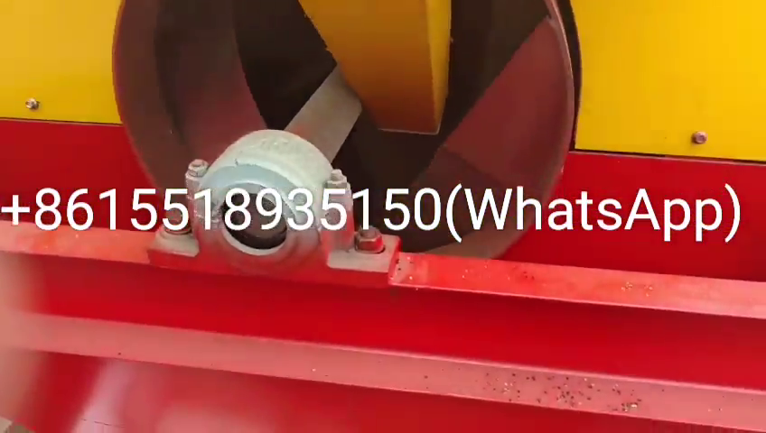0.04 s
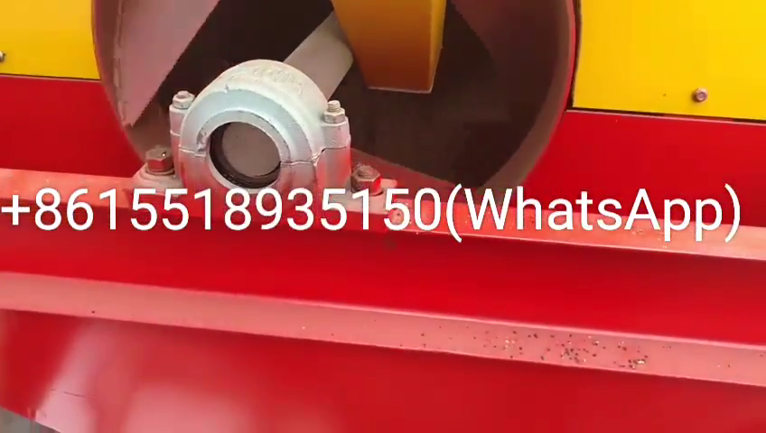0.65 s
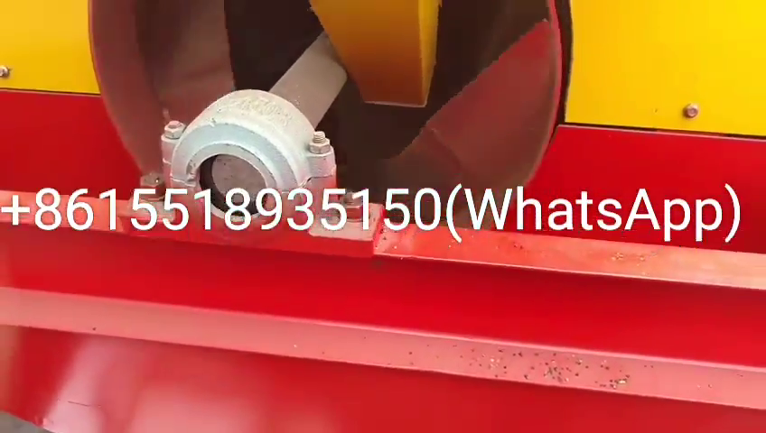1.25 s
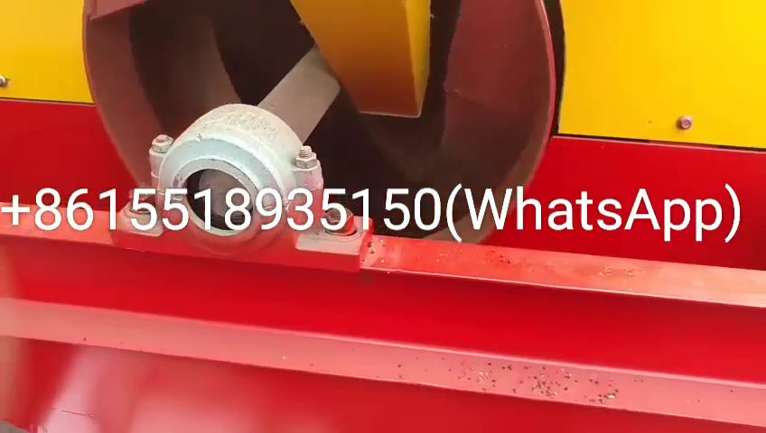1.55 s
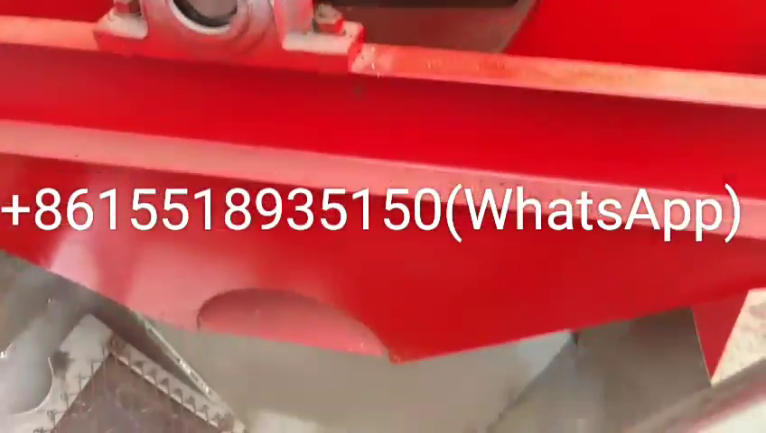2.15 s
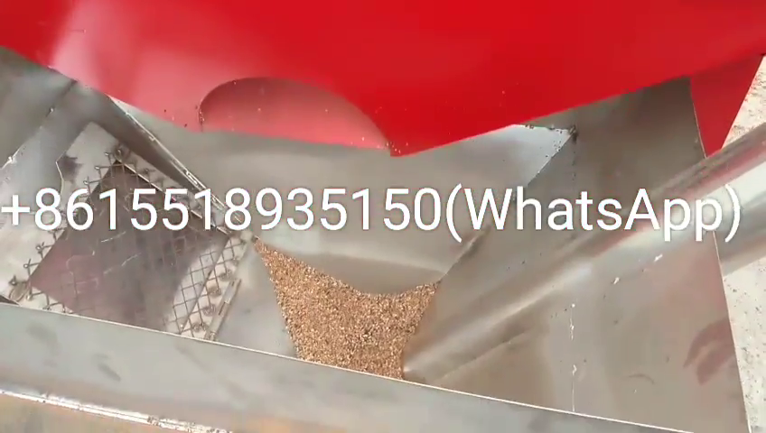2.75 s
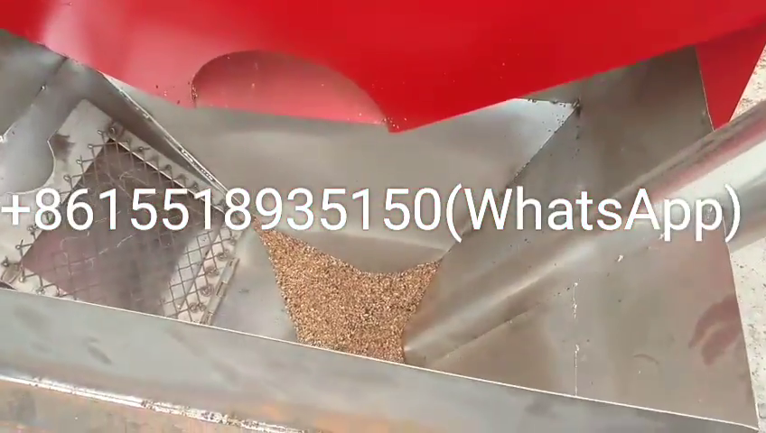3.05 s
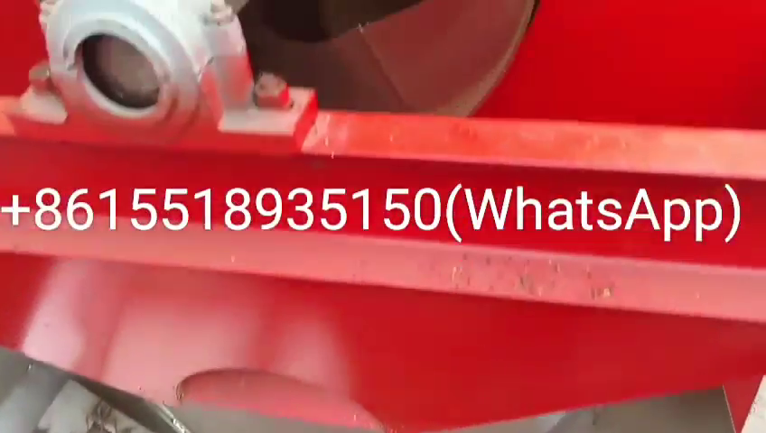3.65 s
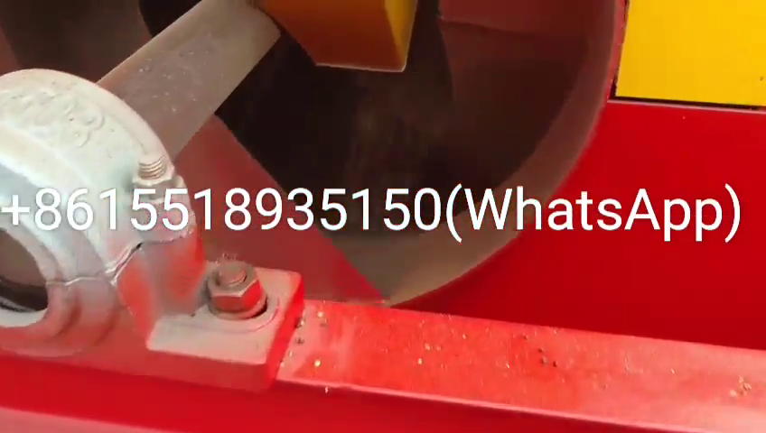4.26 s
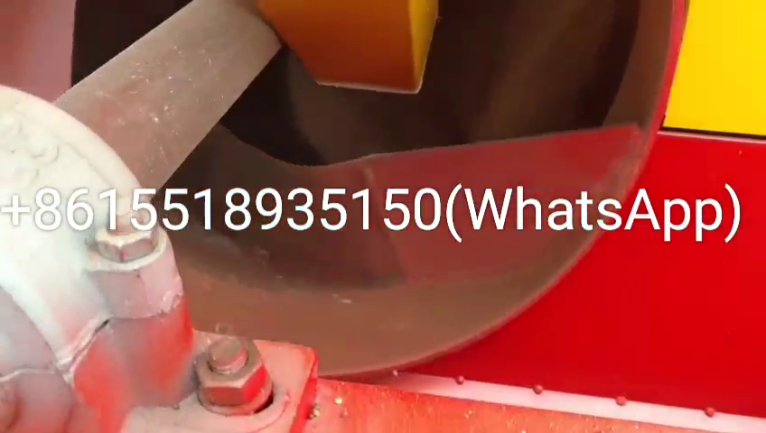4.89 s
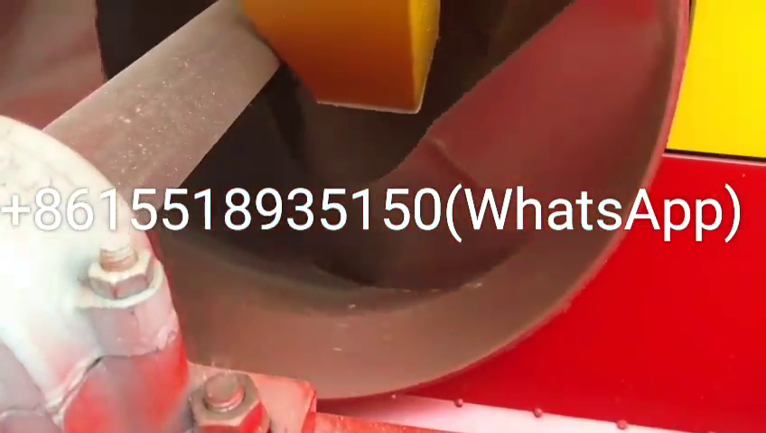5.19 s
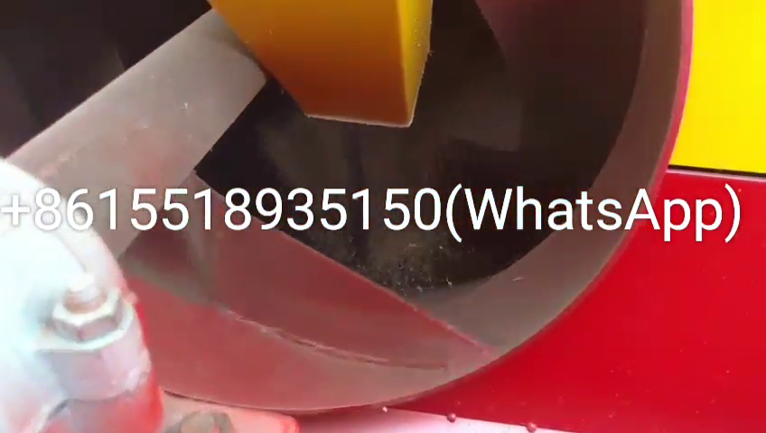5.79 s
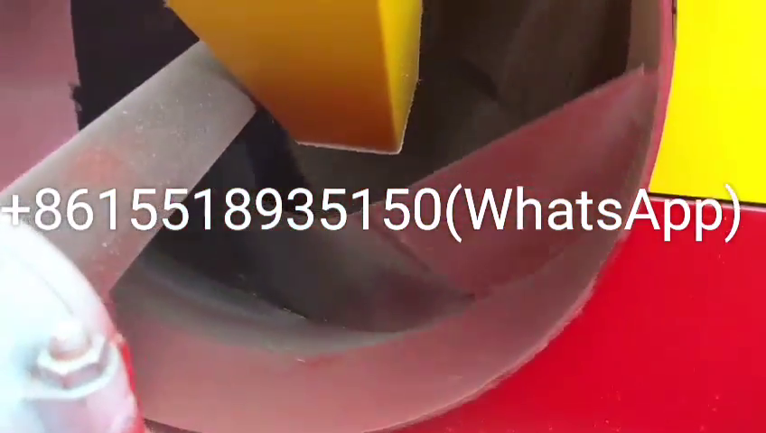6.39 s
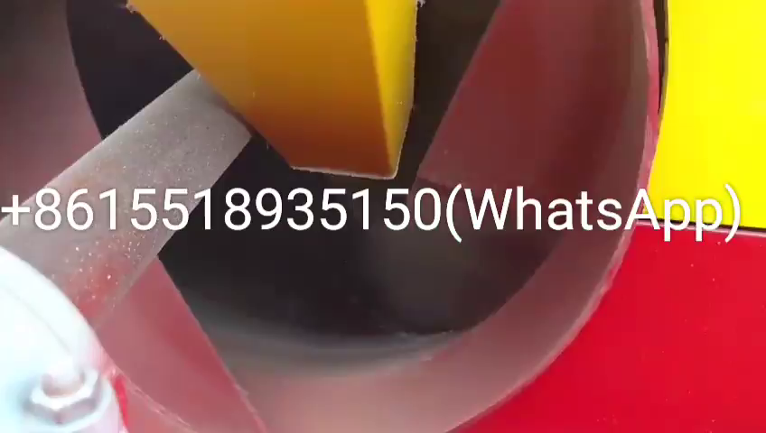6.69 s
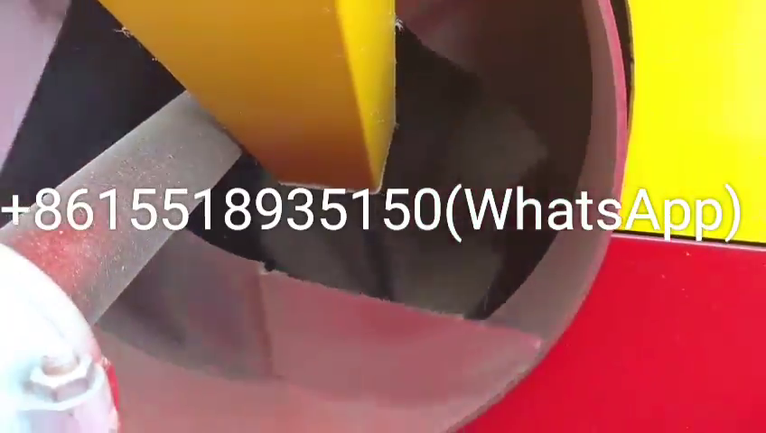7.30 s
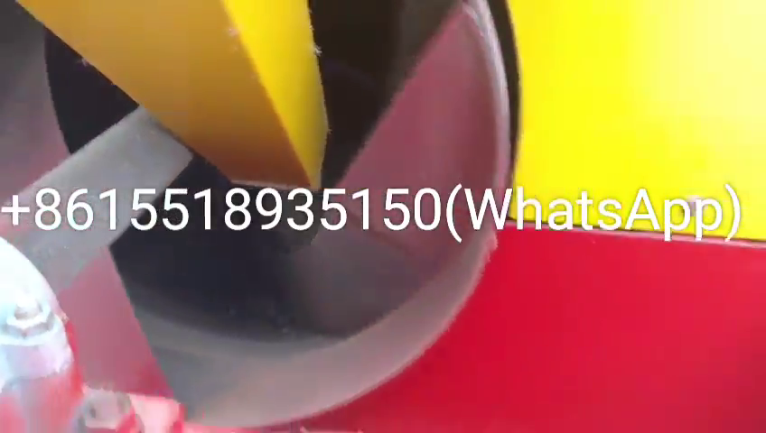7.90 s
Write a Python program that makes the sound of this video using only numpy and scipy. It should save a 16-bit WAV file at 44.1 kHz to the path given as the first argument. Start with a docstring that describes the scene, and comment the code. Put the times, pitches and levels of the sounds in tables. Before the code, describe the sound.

A large drum roaster runs throughout, about eight seconds, heard close on a hand-held microphone in a workshop. Its burner and fan make a steady low roar over a faint, wavering motor hum, with hollow droning tones that swell and fade. Above this, seeds spill and slide on the steel in a bright, grainy hiss that rises and eases in frequent, uneven surges. From about 1.1 to 1.7 seconds the drum rubs with a short, rough groan and scrape, along with a few quick metal clanks, the loudest at 1.3 seconds. Faint, short metal squeaks come at roughly 3.1, 4.9, 5.3, 6.1 and 6.8 seconds. Between 3.5 and 4.4 seconds the microphone moves in on the drum's open mouth, and the sound becomes a little louder, brighter and less hollow. The roar and hiss carry on to the end.

```python
"""A burner's roar and the hiss of pouring seeds, close to a large drum roaster turning in a workshop.
Flame and fan drive the air modes of drum and hopper over a motor hum; vanes spill seeds on the steel.
A second in, the drum rubs with a short groan and a few clanks; later it squeaks faintly now and then.
The hand-held microphone, with two spaced ports, moves in on the open mouth at about four seconds."""
import sys
import numpy as np
from scipy import signal
from scipy.fft import rfft, irfft
from scipy.io import wavfile
from scipy.ndimage import uniform_filter1d

SR = 44100
rng = np.random.default_rng(int(sys.argv[2]) if len(sys.argv) > 2 else 0)


def pcm_store(signal):
    """Save signal as 16-bit PCM."""
    levels = np.round(np.clip(np.atleast_2d(signal), -1, 1) * 32767)
    wavfile.write(sys.argv[1], SR, levels.astype(np.int16).T)


N = 350154
TIME, FREQ = np.arange(N) / SR, np.fft.rfftfreq(N, 1 / SR)

# broad spectrum of the roar, also under the drum's scrapes: frequency_hz, level_db
ROAR_SPECTRUM = [(25, -31), (58, -29.5), (90, -17.5), (145, -9.5), (185, -2.5), (240, -0.9), (340, 3),
                 (450, 2.5), (620, -6), (830, -10), (1050, -12.5), (1500, -16), (2100, -18), (3500, -41)]
# resonances of the steel shell: pitch_hz, width_hz, boost_db
SHELL_MODES = [(3040, 21, 1.5), (3460, 160, 2.5), (3670, 24, -2), (4000, 38, 0.5), (4316, 29, 6),
               (5080, 85, -0.5), (5430, 260, -0.3), (6030, 170, 2.5), (8600, 63, 3)]
# how far the right port trails the left: frequency_hz, lag_rad
PORT_LAG = [(30, 0.32), (115, 2.5), (200, 0.48), (300, 0.97), (500, 0.15), (900, 0.16), (1500, 0.096)]


def gain_of(db):
    """Decibels to amplitude."""
    return 10 ** (np.asarray(db) / 20)


def unit_rms(x):
    """Scales to rms 1."""
    return x / np.sqrt(np.mean(x ** 2) + 1e-20)


def over_freq(points):
    """Rows of (frequency_hz, value) as a curve over all frequencies."""
    hz, value = np.transpose(points)
    return np.interp(np.log(FREQ + 1), np.log(hz + 1), value)


def over_time(points):
    """Rows of (time_s, value) as a curve over the whole scene."""
    return np.interp(TIME, *np.transpose(points))


def below(hz):
    """Response of a steep low-pass."""
    return 1 / (1 + (FREQ / hz) ** 8)


def bell(hz, width):
    """Response of a resonance, 1 at its centre."""
    return 1 / (1 + (2 * (FREQ - hz) / width) ** 2)


def colour(spectrum, modes):
    """A smooth spectrum with resonances standing out of it."""
    return gain_of(over_freq(spectrum) + sum(db * bell(hz, width) for hz, width, db in modes))


def drift(rate_hz):
    """A random wander of rms 1, mostly slower than rate_hz."""
    return unit_rms(irfft(rfft(rng.standard_normal(N)) * (FREQ > 0) / (1 + (FREQ / rate_hz) ** 4), N))


def steadied(spectrum, amount, samples):
    """A spectrum as sound of rms 1, with a share of its swings slower than `samples` evened out."""
    sound = irfft(spectrum, N)
    power = uniform_filter1d((sound ** 2).mean(0), size=samples) + 1e-12
    return unit_rms(sound / power ** (amount / 2))


def wall_ripple(spacing_hz):
    """Reflections inside the drum: a fine random ripple across frequency."""
    heights = rng.standard_normal(2000)
    return np.interp(FREQ / spacing_hz, np.arange(len(heights)), heights)


def mottled(sound, depth_db, window, bins, frames, deeper_above_hz=np.inf):
    """Lays passing random patches of colour, bins by frames in size, on a sound."""
    hz, _, cells = signal.stft(sound, SR, nperseg=window)
    patches = uniform_filter1d(rng.standard_normal(cells.shape[1:]), size=bins, axis=0)
    patches = unit_rms(uniform_filter1d(patches, size=frames, axis=1))
    patch_db = depth_db * (1 + (hz[:, None] / deeper_above_hz) ** 2) * patches
    return signal.istft(cells * gain_of(patch_db), SR, nperseg=window)[1][:, :N]


def port_noise():
    """Spectra of white noise at the two ports: alike in the low mids, unrelated elsewhere."""
    # likeness of the two ports: frequency_hz, coherence
    likeness = [(30, 0), (110, 0), (300, 0.97), (600, 0.72), (800, 0.64), (1000, 0), (15000, 0)]
    left, other = rfft(rng.standard_normal((2, N)))
    same = np.clip(over_freq(likeness), 0, 1)
    right = (same * left + np.sqrt(1 - same ** 2) * other) * np.exp(-1j * over_freq(PORT_LAG))
    return np.array([left, right])


def tone(hz, waver_hz, rate_hz):
    """A sustained tone of rms 1 at the two ports, its pitch wandering a little."""
    phase = 2 * np.pi * np.cumsum(hz + waver_hz * drift(rate_hz)) / SR
    return unit_rms(np.sin([phase, phase - np.interp(hz, FREQ, over_freq(PORT_LAG))]))


def nearness():
    """How close the microphone is to the drum's mouth, 0-1."""
    # the microphone's path: time_s, nearness
    path = [(0, 0.2), (2, 0.27), (3.5, 0.26), (4.4, 0.81), (7.94, 0.72)]
    return np.clip(over_time(path), 0, 1)


def approach(sound):
    """Nearer the mouth, the sound brightens and the hollow ring of the hopper fades."""
    # colour at the mouth against that from afar: frequency_hz, change_db
    mouth_colour = [(60, -6), (100, -4), (165, -4.5), (240, -2), (480, -3.5), (620, -11), (830, 1),
                    (1050, -5), (1400, -2), (2400, -5.5), (3600, 5.5), (4700, -0.5), (5300, -2.5),
                    (5800, -4.5), (6500, 1), (7500, 3), (12000, 0.5)]
    near, spectrum, change = nearness(), rfft(sound), gain_of(over_freq(mouth_colour) / 2)
    return near * irfft(spectrum * change, N) + (1 - near) * irfft(spectrum / change, N)


def motor(hum_hz=117.8, waver_hz=0.9, waver_db=2.4, lag_rad=1.2):
    """The motor's wavering hum meets the two ports out of step."""
    # slow course of the hum: time_s, level_db
    hum_levels = [(0, -38.5), (0.75, -44.5), (1.15, -41), (1.42, -50), (1.85, -41), (3.1, -43),
                  (3.95, -35.5), (4.2, -40), (6.6, -38), (6.8, -36), (7.02, -40), (7.94, -36.5)]
    phase = 2 * np.pi * np.cumsum(hum_hz + waver_hz * drift(3.1)) / SR
    level = gain_of(over_time(hum_levels) + waver_db * drift(9.3))
    return level * unit_rms(np.sin([phase, phase - lag_rad]))


def squeaks(unsteady=0.012):
    """Metal slides on metal in faint, short, gliding tones."""
    # squeaks: start_s, length_s, start_hz, end_hz, level_db
    glides = [(3.114, 0.12, 766, 704, -24.5), (3.184, 0.15, 1680, 1610, -35.5),
              (4.888, 0.15, 748, 805, -25), (5.33, 0.096, 1680, 1600, -40), (6.144, 0.073, 1550, 1470, -37),
              (6.767, 0.079, 1820, 1870, -33)]
    sound, jitter = np.zeros(N), 1 + unsteady * drift(72)
    for start, length, start_hz, end_hz, db in glides:
        progress = np.clip((TIME - start) / length, 0, 1)
        phase = 2 * np.pi * np.cumsum((start_hz + (end_hz - start_hz) * progress) * jitter) / SR
        sound += gain_of(db) * np.sin(np.pi * progress) * np.sin(phase)
    return sound


def standing_waves():
    """Air modes drone, part tone and part turbulence, swelling as the microphone passes their crests."""
    # air modes of drum and hopper: pitch_hz, width_hz, level_db, tone_share
    air_modes = [(200.5, 8.5, -40.5, 0.23), (303.2, 6.8, -35, 0.65), (403.4, 6.9, -35.5, 0.74),
                 (441.7, 13.4, -36.5, 0.4), (646.5, 25, -41.3, 0.11), (833, 31, -44.5, 0.08)]
    # arched swells and dips of single modes: middle_s, length_s, mode_hz, change_db
    swells = [(0.52, 0.76, 200.3, 8.5), (1.05, 0.5, 200.3, -12), (3.29, 0.53, 200.3, 10),
              (4.286, 0.56, 200.3, 10), (5.233, 0.58, 200.3, 13.5), (7.007, 0.74, 200.3, 8.5),
              (7.85, 0.39, 200.3, 10.5), (4.217, 0.37, 303.3, 11), (5.415, 1.37, 303.3, 11),
              (6.108, 0.21, 303.3, 10), (6.8, 1.8, 303.3, 7), (0.83, 0.9, 402.3, 11), (2.0, 0.6, 402.3, 3),
              (2.61, 0.31, 402.3, 10.5), (3.25, 1.3, 402.3, 7.5), (4.75, 0.5, 402.3, 7),
              (5.7, 0.9, 402.3, -6), (2.3, 0.95, 442.3, 10.5), (3.85, 0.96, 442.3, 12),
              (6.202, 0.16, 442.3, 16), (6.537, 0.77, 442.3, 12), (7.225, 0.55, 442.3, 8.5),
              (7.7, 1.9, 442.3, 5.5), (0.5, 0.39, 648, 4), (2.1, 0.68, 648, 4), (3.704, 1.3, 648, 10.5),
              (6.75, 0.55, 648, 9.5), (7.538, 0.25, 648, 11), (3.0, 1, 836, 8.5)]
    air, sound = port_noise(), np.zeros((2, N))
    for hz, width, db, tone_share in air_modes:
        swell_db = sum(change_db * np.cos(np.pi * np.clip((TIME - middle) / length, -.5, .5))
                       for middle, length, mode_hz, change_db in swells
                       if np.isclose(mode_hz, hz, rtol=.05))
        rough = steadied(air * bell(hz, width), 0.76, samples=5000)
        pure = tone(hz, waver_hz=2.38, rate_hz=6.85)
        sound += gain_of(db + swell_db) * (np.sqrt(tone_share) * pure + np.sqrt(1 - tone_share) * rough)
    return sound


def clanks(t60_s=0.31, rise_s=0.0019):
    """Loose steel knocks during the rub, waking dense upper modes of the shell that die quickly."""
    # blows: start_s, level_db
    blows = [(1.155, -28), (1.245, -23), (1.305, -15), (1.345, -24), (1.445, -23)]
    # broad spectrum of a blow: frequency_hz, level_db
    blow_spectrum = [(600, -18), (1400, -10), (1900, 3.5), (2300, 17), (2700, -4), (3500, -4.5), (6000, -6),
                     (9000, -18), (15000, -21)]
    ring = unit_rms(irfft(port_noise() * colour(blow_spectrum, SHELL_MODES), N))
    ages = [(np.maximum(TIME - start, 0), db) for start, db in blows]
    return ring * sum((1 - np.exp(-age / rise_s)) * gain_of(db - 60 * age / t60_s) for age, db in ages)


def rub(groan_hz=566, trim_db=-2.0, roughness=0.34):
    """Uneven friction keeps one mode of the drum groaning, while rough scrapes wake its other modes."""
    # course of the groan: time_s, level_db
    groan_levels = [(1.12, -23), (1.162, -13), (1.205, -27), (1.25, -22), (1.32, -19.5), (1.4, -15),
                    (1.435, -24), (1.56, -19.5), (1.63, -30), (1.76, -30)]
    # modes of the rubbed drum: pitch_hz, width_hz, boost_db
    drum_modes = [(283.5, 20, 13), (311, 18, 11), (327, 20, 7), (414.5, 12, 13), (503, 12, 0),
                  (605, 24, 11), (660, 24, 4), (764, 49, 9), (900, 30, 9), (1104, 16, 12.5), (1220, 22, 5),
                  (1360, 16, 9)]
    # scrapes: start_s, length_s, centre_hz, width_hz, level_db
    scrapes = [(1.118, 0.084, 684, 180, -19), (1.3, 0.06, 1200, 890, -24), (1.215, 0.077, 274, 62, -15),
               (1.16, 0.41, 490, 760, -19.5), (1.315, 0.07, 740, 310, -21), (1.26, 0.31, 1180, 1350, -24.5),
               (1.36, 0.049, 314, 80, -21), (1.372, 0.06, 560, 220, -16), (1.35, 0.15, 412, 26, -21.5)]
    rubbing = (TIME > groan_levels[0][0]) & (TIME < groan_levels[-1][0])
    gate = uniform_filter1d(rubbing * 1., size=1500)
    ring = tone(groan_hz, waver_hz=19, rate_hz=55) * (1 + roughness * drift(110))
    sound = ring * gain_of(over_time(groan_levels) + trim_db) * gate
    body = colour(ROAR_SPECTRUM, drum_modes)
    for start, length, hz, width, db in scrapes:
        friction = steadied(port_noise() * body * bell(hz, width) ** 2, 1, samples=800)
        sound += gain_of(db) * np.sin(np.pi * np.clip((TIME - start) / length, 0, 1)) * friction
    return sound


def seed_flow(rise_s=0.13, fall_s=0.032):
    """Vanes spill seeds: flow in dB over the steady trickle, and extra dB of bright spray."""
    # spills that build, hold and run out: start_s, length_s, flow_db, spray_db
    spills = [(-0.03, 0.51, 2, 2), (0.486, 0.33, -2, 1.5), (1.618, 0.19, -7.5, 3.5), (1.804, 0.24, -2, 0),
              (2.112, 0.27, -1.5, -4.5), (2.68, 0.29, -3, 0), (2.94, 0.19, -0.5, -0.5),
              (3.22, 0.069, 2, -3), (3.38, 0.15, 0, -4), (3.606, 0.51, 0.8, -2.5), (4.183, 0.24, -2.5, 2.5),
              (4.414, 0.36, -3, 0.5), (4.84, 0.098, 1.5, -7), (5.0, 0.17, -7, -1.5), (5.254, 0.13, -2.5, 2),
              (5.418, 0.38, -1, 1.5), (5.84, 0.15, 0, 0.5), (6.326, 0.3, 0, -0.5), (6.547, 0.36, 0, 1.5),
              (7.05, 0.27, -2, 0), (7.6, 0.19, 0, -2), (7.83, 0.088, -4, -1)]
    # a brief dip just before the loudest clank: middle_s, half_width_s, change_db
    lull = (1.287, 0.013, -3)
    flow, bright_db = np.ones(N), np.zeros(N)
    for start, length, db, spray_db in spills:
        age = TIME - start
        shape = np.clip(age / rise_s, 0, 1) * np.exp(-np.maximum(age - length, 0) / fall_s)
        flow += gain_of(db) ** 2 * shape
        bright_db += spray_db * shape
    middle, half_width, dip_db = lull
    return 10 * np.log10(flow) + dip_db * np.exp(-((TIME - middle) / half_width) ** 2), bright_db


def scattered(drive, shared=0.17, lead_s=.0003):
    """Two drives as port spectra: a share reaches both, the right first, scattered by the drum's walls."""
    left, other = rfft(drive)
    phase = 2 * np.pi * FREQ * lead_s + wall_ripple(spacing_hz=200)
    return np.array([left, shared * left * np.exp(1j * phase) + np.sqrt(1 - shared ** 2) * other])


def spray(spectrum, level, fizz_hz=11500):
    """The spray flickers, and its finest fizz grows faster than the rest as more seeds fall."""
    body = irfft(spectrum * below(fizz_hz), N) * gain_of(.85 * drift(18))
    fizz = irfft(spectrum * (1 - below(fizz_hz)), N) * unit_rms(level) ** .45 * gain_of(drift(22))
    return level * unit_rms(body + fizz)


def seeds(flow_db, bright_db, slide_db=-29.5, spray_db=-43.0, split_hz=7800, ticks_per_s=4000):
    """Countless seeds slide on the shell as a hiss; single ones tick, and they fall in clumps."""
    ticks = (rng.random((2, N)) < ticks_per_s / SR) * rng.choice([-1, 1], (2, N))
    ticks = .45 * unit_rms(ticks * gain_of(3.2 * np.minimum(rng.exponential(1, (2, N)), 4.5)))
    hiss = rng.standard_normal((2, N)) + ticks
    # clumps land on different parts of the shell
    hiss = mottled(hiss, depth_db=0.57, window=512, bins=9, frames=9, deeper_above_hz=8500)
    # the fine ripples keep shifting
    hiss = mottled(hiss, depth_db=1.6, window=2048, bins=2, frames=16)
    # broad spectrum of seeds on steel: frequency_hz, level_db
    hiss_spectrum = [(800, -39), (1800, -61), (2400, 0), (3000, -2), (4200, 0.5), (4700, -0.8), (5700, 1.1),
                     (7000, -3), (8200, -2.5), (9800, -6.5), (12000, -10), (13200, -13.5), (14300, -12),
                     (15300, -20)]
    steel = scattered(hiss) * colour(hiss_spectrum, SHELL_MODES)
    steel *= gain_of(1.64 * wall_ripple(spacing_hz=25))
    clumps_db = 0.65 * drift(32)
    sliding = gain_of(slide_db + 0.96 * flow_db + clumps_db) * unit_rms(irfft(steel * below(split_hz), N))
    spray_level = gain_of(spray_db + 0.94 * flow_db + bright_db + 2 * nearness())
    return sliding + spray(steel * (1 - below(split_hz)), spray_level)


def burner(flow_db, rumble_hz=135, rush_hz=560, flutter_db=0.55, steadiness=0.3):
    """Flame and fan noise in the housing: a rumble, a deep roar, and a rush that grows as seeds fall."""
    # resonances of the housing: pitch_hz, width_hz, boost_db
    housing_modes = [(184, 13, 2), (209.3, 14.6, 5), (231, 22, 5), (252.5, 3.7, 4.5), (342.2, 5.7, 7.5),
                     (491, 12, 4.5), (599, 6.7, 5), (634, 26, 4), (792, 30, 3), (840, 18, 2.5),
                     (913, 13, 3), (969, 10, 4.5), (1219, 22, 5.5), (1440, 34, 3.5)]
    # slow course of the roar: time_s, level_db
    roar_levels = [(0, -23), (0.17, -24), (0.37, -23.5), (0.8, -24), (1.02, -24.5), (1.4, -23),
                   (1.68, -25.5), (2.05, -23), (2.75, -23), (3.6, -22.5), (4.0, -21.5), (4.6, -21),
                   (5.95, -21.5), (6.3, -20.5), (6.75, -20.5), (7.1, -22), (7.93, -21.5)]
    air = port_noise() * colour(ROAR_SPECTRUM, housing_modes)
    rumble = gain_of(-19.5) * unit_rms(irfft(air * below(rumble_hz), N))
    deep = steadied(air * (below(rush_hz) - below(rumble_hz)), steadiness, samples=3000)
    echoes = gain_of(1.8 * wall_ripple(spacing_hz=14))
    rush = steadied(air * (1 - below(rush_hz)) * echoes, steadiness, samples=3000)
    rush *= gain_of(-5.5 + 0.83 * flow_db - 1.36 * nearness())
    return ((deep + rush) * gain_of(flutter_db * drift(28)) + rumble) * gain_of(over_time(roar_levels))


def scene():
    """The whole roaster at the microphone's two ports."""
    flow_db, bright_db = seed_flow()
    running = approach(burner(flow_db) + motor() + seeds(flow_db, bright_db))
    return running + standing_waves() + rub() + clanks() + squeaks()


def record(dry, port_delay_s=.000435, edge_hz=15480):
    """The microphone: each port minus the delayed far one for width, and a band limit; the sound also has a
    narrow, deep gap near 2.3 kHz."""
    # left port over right: frequency_hz, difference_db
    balance = [(40, -6), (130, 1.5), (300, 0), (1200, -2.5), (2300, 4), (4500, -5.5), (8000, -2.5),
               (11000, -1), (15000, -1.2)]
    # how much of the far port is subtracted: frequency_hz, share
    crossfeed = [(350, 0.023), (700, 0.87), (1100, 1), (2200, 0.85), (2500, 1), (3400, 0.41), (4600, 0.37),
                 (7000, 0.16), (9200, 0.02), (14000, 0.042)]
    # a narrow, deep gap in the sound near 2.3 kHz: centre_hz, width_hz, gain_db
    hollow = (2288, 380, -20.5)
    ports = rfft(dry) * gain_of(np.outer([.5, -.5], over_freq(balance)))
    far_ports = ports[::-1] * np.exp(-2j * np.pi * FREQ * port_delay_s)
    share = np.clip(over_freq(crossfeed), 0, 1)
    wide = (ports - share * far_ports) / np.sqrt(1 + share ** 2)
    hz, width, db = hollow
    notch = gain_of(db / (1 + (2 * (FREQ - hz) / width) ** 6))
    band_limit = np.clip((edge_hz - FREQ) / 150 + .5, 0, 1)
    return irfft(wide * notch * band_limit, N)


dry = scene()
out = record(dry)
pcm_store(out)
```